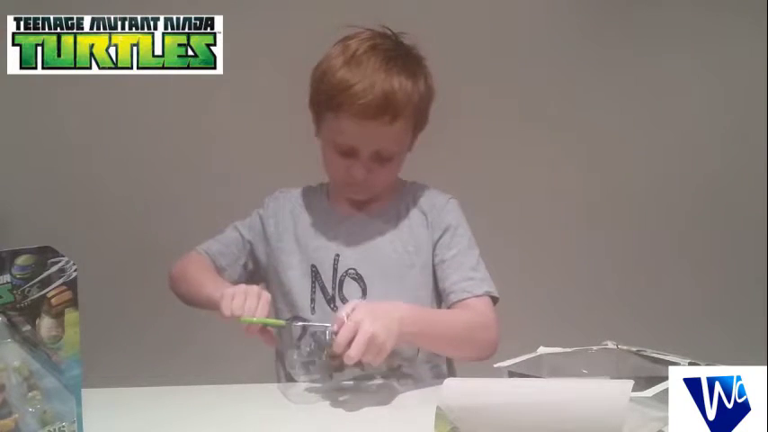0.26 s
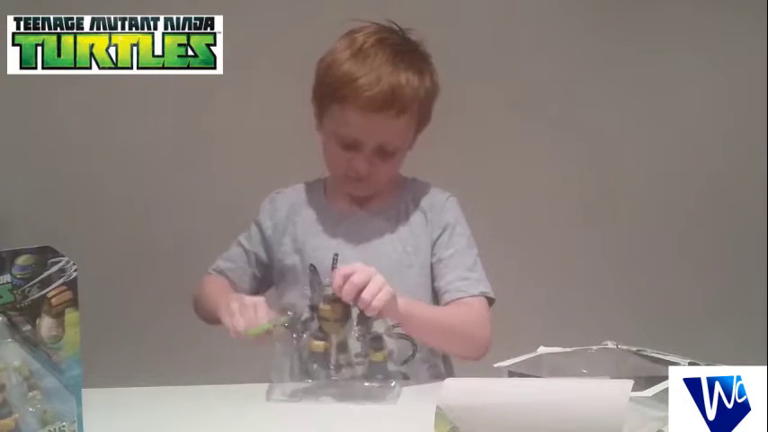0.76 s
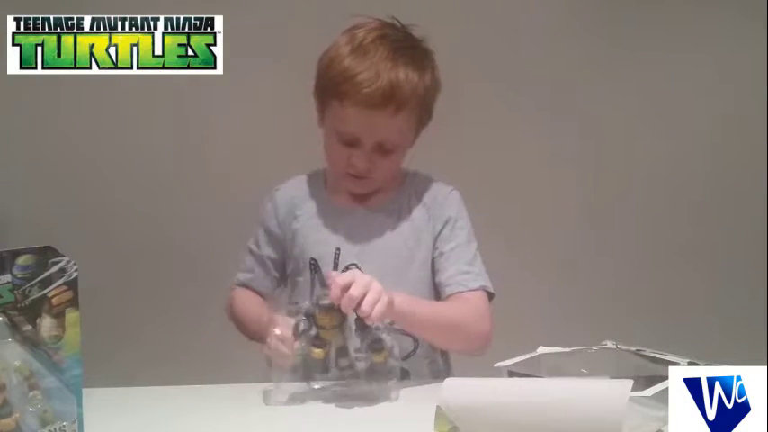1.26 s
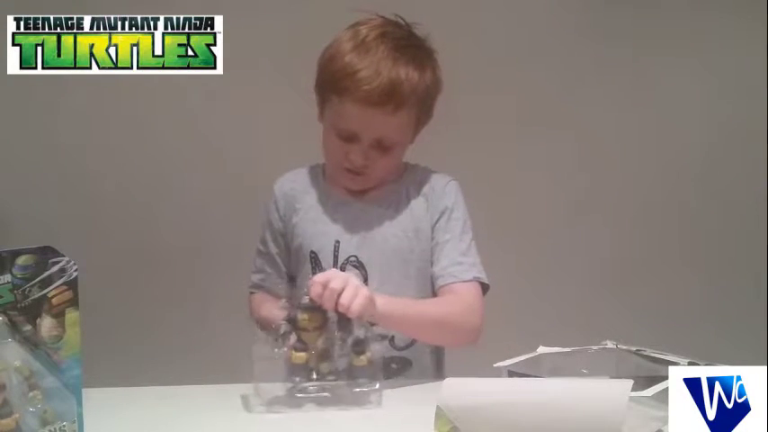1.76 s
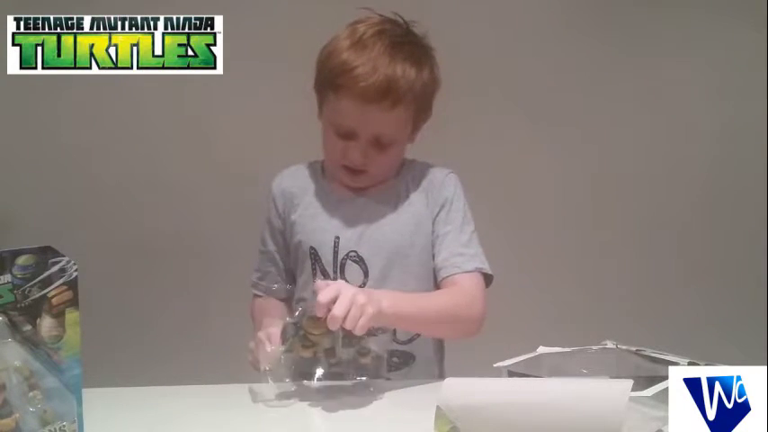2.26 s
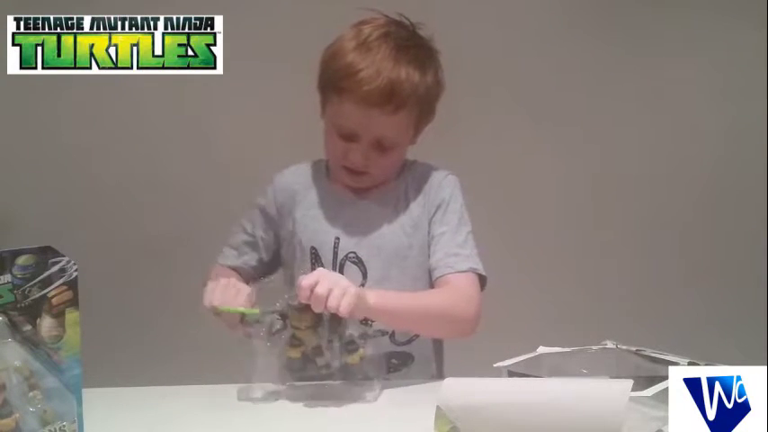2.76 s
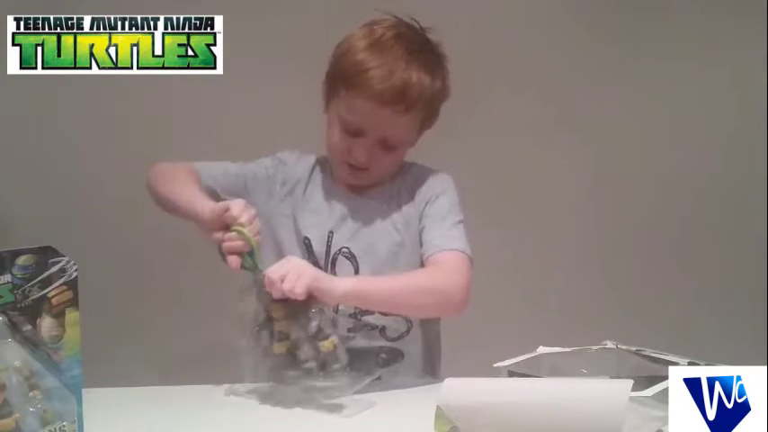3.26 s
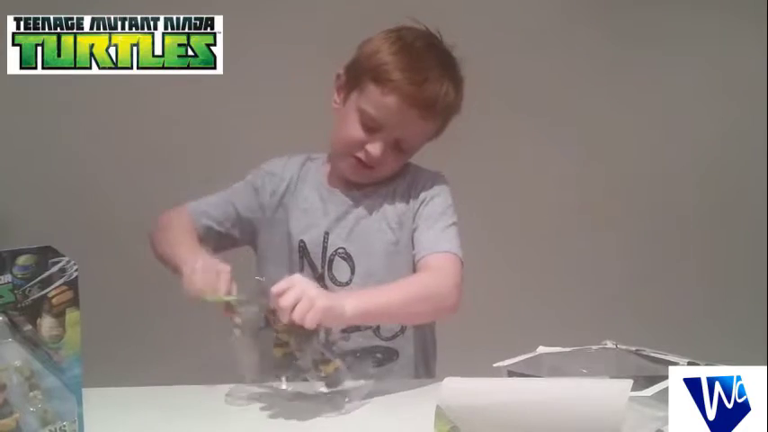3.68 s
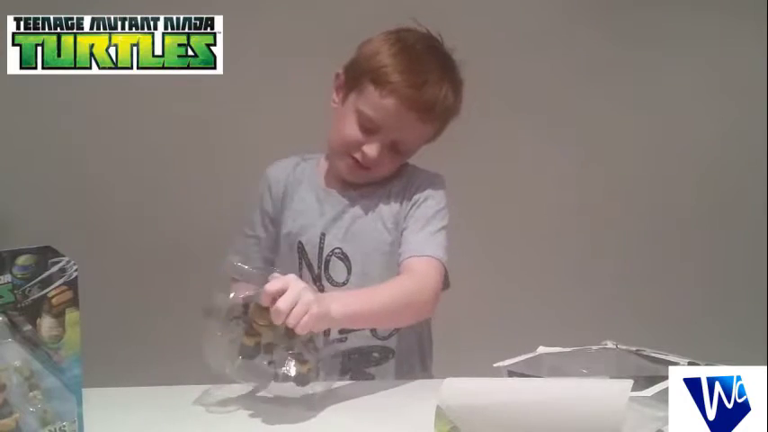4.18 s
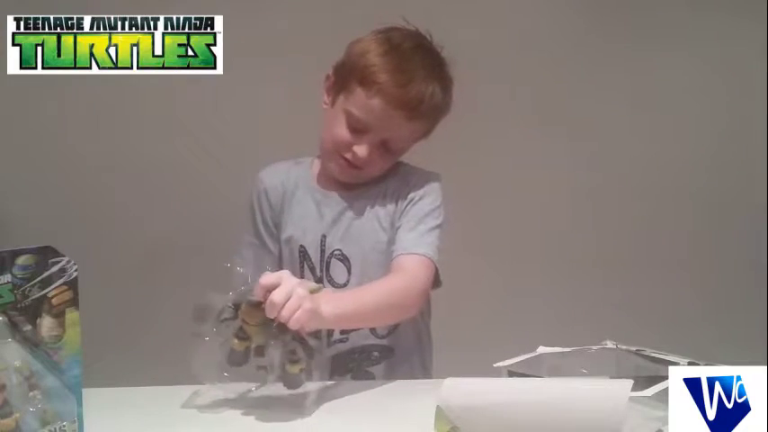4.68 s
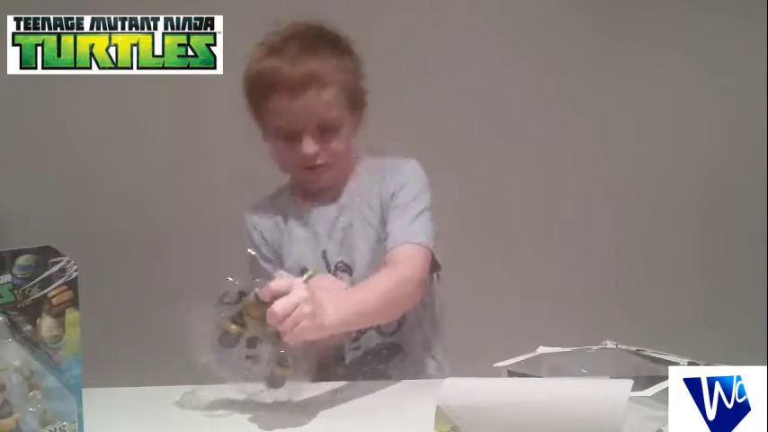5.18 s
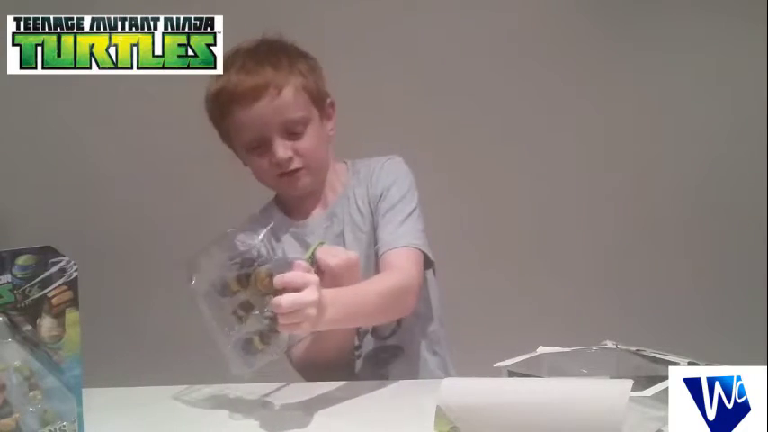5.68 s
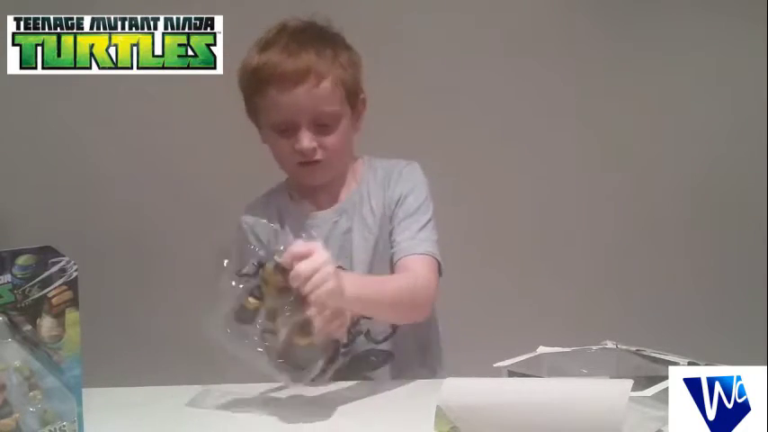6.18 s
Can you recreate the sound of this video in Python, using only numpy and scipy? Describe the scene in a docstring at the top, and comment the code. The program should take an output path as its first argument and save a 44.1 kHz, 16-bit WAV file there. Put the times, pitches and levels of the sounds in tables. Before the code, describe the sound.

Brittle plastic cracks and pops under scissors and hands. The pack judders and scrapes in short strokes, the tabletop drums low beneath it, and creases click. Strong knocks come midway, followed by dense crinkling, a sparser stretch, and sharp late snips before it calms. A bare, lively small room, heard from across the table, with low rumble and faint hiss.

```python
"""A bare, lively room, one microphone across the table from a stiff plastic blister pack being cut by hand.
Scissor blades snap through and creases click: short noise bursts that ring at the cut edge or fold.
Thin walls buckle with hollow pops, and the pack knocks on the table top: bursts through resonances.
Between them the rim judders and scrapes, the sheet crinkles and the table drums: trains of tiny slips.
One deep, soft bump comes early; low rumble and faint hiss lie under it all."""
import sys
import numpy as np
from scipy import signal
from scipy.fft import rfft, irfft, next_fast_len
from scipy.io import wavfile
from scipy.ndimage import uniform_filter1d

SR = 44100
rng = np.random.default_rng(int(sys.argv[2]) if len(sys.argv) > 2 else 0)


def to_wav(sig):
    """Store sig (one row per channel, or 1-D mono) as 16-bit WAV at the path in sys.argv[1].

    Samples outside -1..1 are clipped; the rate is SR.
    """
    pcm = np.clip(np.atleast_2d(sig), -1, 1) * 32767
    pcm = np.round(pcm).astype(np.int16)
    wavfile.write(sys.argv[1], SR, pcm.T)  # frames by channels


N = 282766

# All event and spectrum levels are relative: each layer has its own gain further down.
# rumble and hiss of the quiet room: f/Hz, level/dB
HISS_SPECTRUM = [(25, -17), (80, 3), (160, -21), (300, -23.5), (500, -35.5), (900, -18), (1500, -50.5),
                 (2200, -31), (3200, -43), (4300, -27), (6500, -68), (9500, -42.5), (16000, -54.5)]
# reverberation of the room: f/Hz, time to fall by 60 dB t60/s
ROOM_DECAY = [(150, 0.71), (600, 0.31), (1500, 0.37), (4500, 0.48), (9000, 0.41), (15000, 0.33)]
# modes of the table top: f/Hz, width/Hz, level/dB
TABLE_MODES = [(154.8, 11, -0.5), (199.3, 28, -13), (310, 19.5, -3.5), (264.5, 19, -11), (397.4, 14, -7),
               (480.3, 40, -4.5), (605, 63, -10.5), (695, 20, -19.5), (744, 41, -12), (902, 31, -9.5),
               (1060, 140, -15.5), (1181, 69, -16.5), (1620, 98, -17)]
# modes of the whole blister shell: f/Hz, width/Hz, level/dB
SHELL_MODES = [(1520, 6.3, -8), (1610, 18, -4), (1823, 5.9, 2), (1856, 11, -9), (1980, 14, -1.5),
               (2220, 42, -2), (2660, 11, -9)]
# ring of a buckling wall and its overtones: f/(pitch of the pop), level/dB
WALL_RING = [(.2, -40), (.5, -8), (.75, 2.5), (1.0, 6.5), (1.35, -5.5), (1.8, -6), (2.3, -19), (3.4, -20),
             (6.0, -47.5), (12, -43.5)]

# spectra of a crack, a thud, the juddering rim, its scrape, and the crinkling sheet: f/Hz, level/dB
CRACK_SPECTRUM = [(150, -22.5), (500, -6), (1200, 0), (2400, -2), (3300, -4), (4800, 1.5), (6200, -2),
                  (8500, 5), (12000, 5), (15500, -2.5)]
THUD_SPECTRUM = [(80, -31), (250, -19.5), (500, 6), (950, 0), (1700, -4), (2800, -10.5), (4500, -24.5),
                 (9000, -49.5)]
JUDDER_SPECTRUM = [(100, -7.5), (220, -13), (330, -8.5), (520, 1.5), (800, 2), (1100, -3.5), (1600, -25.5),
                   (4000, -45.5)]
SCRAPE_SPECTRUM = [(500, -55.5), (1000, 7.5), (1300, 2.5), (2000, 0.5), (2700, -5.5), (3500, -20.5),
                   (5500, -34), (12000, -56)]
CRINKLE_SPECTRUM = [(1500, -34.5), (4000, 6), (6000, -9), (9000, 1), (12000, 0), (15500, -3)]
# spectra of the table's drumming and of single crease ticks: f/Hz, level/dB
DRUM_SPECTRUM = [(90, -4.5), (145, 2.0), (200, 1.5), (320, -10.0), (600, -25)]
TICK_SPECTRUM = [(500, -13.5), (1500, 7.5), (2400, 0), (5500, -5), (8500, 5.5), (15000, -10.5)]
# colour of the judder when the rim skims and when it is pressed down: f/Hz, level/dB
SKIMMING = [(150, -26.5), (330, -0.5), (650, -6), (1100, -1.0), (2200, -18.0), (6000, -21.5)]
PRESSED = [(80, -7.5), (150, 4.5), (330, -0.5), (550, -4.0), (1100, -6.5), (2200, -22.0), (6000, -53.0)]

# the rim slides: full speed at t/s, run-up/s, hold/s, judder level/dB, scrape over judder/dB
RIM_SLIDES = [(0.253, 0.076, 0.034, -62.5, 10), (0.579, 0.082, 0.039, -30, -6.5),
              (0.787, 0.026, .02, -36.5, 0), (0.846, 0.12, 0.12, -40, -11.5),
              (1.237, 0.016, 0.014, -43, -21), (1.333, .05, 0.027, -44, -4),
              (1.45, 0.12, 0.0055, -34.5, -16.5), (1.659, 0.092, 0.053, -29.5, -8),
              (1.877, 0.061, 0.018, -74, 13), (2.252, 0.076, 0.04, -27, -10.5),
              (2.495, 0.12, 0.043, -40.5, -5), (2.727, 0.037, 0.014, -21, -12),
              (2.994, 0.032, 0.1, -45, -10), (3.101, 0.02, .01, -36, -8.5), (3.182, 0.11, 0.031, -42, -5.5),
              (3.29, 0.032, .015, -33.5, -7), (3.41, 0.031, 0.0067, -33, -14),
              (3.604, 0.099, 0.021, -32, -3.5), (3.726, 0.096, 0.12, -38, -1),
              (4.11, 0.028, 0.036, -45.5, -12), (4.29, 0.055, 0.041, -53, -4),
              (4.535, 0.05, 0.024, -40, -25), (4.72, .03, 0.022, -41.5, -20),
              (4.949, 0.033, 0.012, -51, -5.5), (5.238, 0.038, 0.0034, -28.5, -17)]
# the hands lean on the pack and the table drums: t/s, level/dB
HAND_PRESSES = [(0.19, -52), (0.27, -50.5), (0.79, -39), (0.87, -32), (0.94, -36), (1.252, -34.5),
                (1.35, -36.5), (1.5, -33), (1.74, -30), (2.29, -32.5), (2.41, -39), (2.59, -39),
                (2.735, -33.5), (3.1, -42), (3.449, -30.5), (3.722, -24), (3.824, -29), (4.115, -34),
                (4.17, -37), (4.289, -41.5), (4.548, -35), (4.62, -37), (4.71, -37), (4.829, -39),
                (4.96, -32.5), (5.06, -44.5), (5.232, -24.5)]
# the sheet is bent and crinkles: full strength at t/s, hold/s, level/dB
SHEET_BENDS = [(0.6, 0.011, -68), (0.785, 0.033, -55), (0.87, .14, -64), (1.33, 0.083, -49),
               (1.73, 0.014, -55), (2.27, 0.053, -43.5), (2.55, 0.015, -53), (2.72, 0.071, -54),
               (2.9, 0.33, -64), (3.31, 0.093, -47), (3.56, 0.073, -45.5), (3.72, 0.018, -46),
               (3.78, 0.031, -44.5), (4.65, .012, -60.5), (4.82, .012, -62.5)]
# the blades break through the plastic: t/s, level/dB, edge ring f/Hz, low body/dB, room/dB
BLADE_SNIPS = [(1.225, -17.5, 10800, 4, 2.5), (1.2366, -24.5, 10800, 1, 6), (1.4633, -9, 9000, -10.5, -3),
               (2.2441, -17.5, 8800, 9, 0.5), (2.4285, -13, 8200, 2.5, -1), (3.2621, -16, 10600, 14, 5),
               (5.1931, -36.5, 9120, 10.5, 10), (5.2003, -20.5, 8500, 10, 1.5),
               (5.3369, -8.5, 12800, 6.5, 3), (5.3448, -14.5, 9600, -14, -2.5), (5.7658, -18, 5000, 1.5, 6)]
# a crease in the sheet clicks: t/s, level/dB
CREASE_CLICKS = [(0.033, -50.5), (0.204, -55), (0.243, -45.5), (0.608, -48.5), (0.7541, -41.5),
                 (0.7651, -30.5), (0.7845, -33.5), (0.925, -43), (1.0614, -46), (1.7168, -31.5),
                 (2.148, -60), (2.7128, -23), (2.7668, -28.5), (2.8434, -36), (3.1123, -44.5),
                 (3.5427, -39), (3.5801, -28.5), (3.6379, -28.5), (3.7145, -27.5), (3.856, -32),
                 (4.161, -50.5), (4.322, -41), (4.5939, -41), (4.7523, -35), (4.787, -39.5), (5.1397, -45),
                 (5.681, -46.5)]
# a wall of the blister buckles: t/s, level/dB, pitch f/Hz, overtones/dB
WALL_POPS = [(0.174, -37, 857, -5.5), (0.224, -33, 875, 1.5), (0.351, -35.5, 810, -2),
             (0.466, -35, 759, -1), (0.755, -26.5, 790, 4), (0.786, -34.5, 1007, 8.5),
             (1.057, -34, 1107, 7), (1.463, -27, 2534, -6), (2.148, -55.5, 4340, -2),
             (2.431, -16, 1610, -3), (2.844, -23.5, 765, 6), (3.183, -35, 1275, -0.5),
             (3.213, -36, 1584, -16.5), (3.263, -20.5, 2430, 6.5), (3.534, -32.5, 1618, 2),
             (3.579, -23, 1980, 2.5), (3.686, -30, 773, -1.5), (4.238, -41, 1053, 3.5),
             (4.319, -24, 1095, 4), (4.324, -28.5, 1790, -11), (4.594, -25.5, 1120, -1), (4.7, -29, 899, 5),
             (4.7522, -29.5, 1360, -6.5), (4.787, -31, 1044, 13.5), (5.335, -15, 1060, 7.5),
             (5.681, -54.5, 2530, 2.5), (5.764, -29.5, 2180, 13.5), (6.037, -41.5, 1095, -8),
             (6.255, -50, 1060, -11)]
# the pack strikes the table: t/s, level/dB
TABLE_KNOCKS = [(0.508, -48), (0.754, -22), (1.59, -34.5), (2.413, -23), (2.43, -19), (2.532, -18),
                (2.714, -10.5), (2.765, -25), (2.842, -20.5), (3.1, -40), (3.579, -19), (5.229, -21.5)]

# how fast a slide dies; how much of its judder the table drums along with
SLIDE_STOP_DB_PER_S, DRUM_FOLLOWS_DB = 167.5, -17
PRESS_RISE_S, PRESS_HOLD_S, PRESS_FADE_DB_PER_S = .04, 0.004, 172.5
BEND_RISE_S, BEND_FADE_DB_PER_S = 0.04, 162.5
# the held pack never lies quite still: when it rests on the table, and the levels of its stirring
HELD_S, HELD_LENGTH_S = 0.62, 4.95
STIR_DRUM_DB, STIR_JUDDER_DB, STIR_SCRAPE_DB, STIR_CRINKLE_DB = -57, -62.5, -64.5, -77.5
LIFTED_DB = -8.5  # the stirring before and after, with the pack off the table
# all creases share one edge ring, low body and room level
CREASE_HZ, CREASE_BODY_DB, CREASE_ROOM_DB = 8170, 12.5, -4.5
# decay by 60 dB and build-up time constant of a single crack
CRACK_T60_S, CRACK_RISE_S = .0048, .0006
TOP_HZ = 15850  # band limit of the recorder


def amp(db):
    """Gain of a level in dB."""
    return np.exp(np.asarray(db) * (np.log(10) / 20))


def unit(x):
    """x at rms 1."""
    return x / np.sqrt(np.mean(x ** 2) + 1e-20)


def along(points, hz):
    """(f/Hz, value) points read on a log frequency axis."""
    f, value = np.transpose(points)
    return np.interp(np.log(hz + 1), np.log(f), value)


def filtered(x, response):
    """x times a complex response of frequency, padded so that ringing can die."""
    size = next_fast_len(len(x) + SR // 4)
    hz = np.fft.rfftfreq(size, 1 / SR)
    return irfft(rfft(x, size) * response(hz), size)[:len(x)]


def coloured(x, spectrum, size=2048):
    """x through a causal filter with the given spectrum."""
    gain = amp(along(spectrum, np.fft.rfftfreq(size, 1 / SR)))
    # folding the cepstrum forward gives minimum phase: no sound ahead of its cause
    cepstrum = irfft(np.log(gain))
    cepstrum[1:size // 2] *= 2
    cepstrum[size // 2 + 1:] = 0
    impulse = irfft(np.exp(rfft(cepstrum)))
    return signal.oaconvolve(x, impulse)[:len(x)]


def resonate(x, modes):
    """x through parallel resonances, rows of f/Hz, width/Hz, level/dB."""
    def response(f):
        return sum(amp(db) * 1j * f * width / (centre * centre - f * f + 1j * f * width)
                   for centre, width, db in modes)
    return filtered(x, response)


def even(x, seconds):
    """x with its slow swells taken out, at rms 1."""
    power = np.abs(uniform_filter1d(x ** 2, int(seconds * SR)))
    return x / np.sqrt(power + 1e-12)


def slips(rate, spread_db):
    """Tiny impulses at random times and of random sizes; rate is per second."""
    at = np.flatnonzero(rng.random(N) < rate / SR)
    push, size = rng.standard_normal((2, N))[:, at]
    return np.bincount(at, push * amp(spread_db * size), N)


def room(x, wall_delay=.0105, early_db=-5):
    """The room's answer: thin at first, stronger once the walls reply, dying by band."""
    hz = np.fft.rfftfreq(256, 1 / SR)
    frame_t = np.arange(SR // 256) * 128 / SR
    cells = rng.standard_normal((len(hz), 2 * len(frame_t))).view(complex)
    decay = np.exp(-np.log(1000) * frame_t / along(ROOM_DECAY, hz)[:, None])
    tail = signal.istft(cells * decay)[1]
    t = np.arange(len(tail)) / SR
    tail = tail * np.where(t < wall_delay, amp(early_db), 1) * (t > .002)
    return signal.fftconvolve(x, tail / np.sqrt(np.sum(tail ** 2)))


def diffuse(x, wet_db):
    """x with the room's answer mixed in, at rms 1."""
    return unit(x + amp(wet_db) * room(x)[:N])


def add(track, s, db, spectrum, t60, attack, room_db):
    """Put a burst of the given colour, with its reverberation, into the track at time s."""
    t = np.arange(SR // 16) / SR
    rattle = rng.standard_normal(len(t)) * amp(-60 * t / t60) * (1 - np.exp(-t / attack))
    # the room gathers what is radiated in all directions, so it hears the smooth mean spectrum
    click = 1.0 * (t == 0)
    heard = amp(room_db) * room(unit(coloured(click, spectrum)))
    heard[:len(t)] += unit(coloured(rattle, spectrum))
    part = track[max(round(s * SR), 0):][:len(heard)]
    part += amp(db) * heard[:len(part)]


def stroke(s, rise, hold, fade_db_per_s, run_up_db=20, bend=1.6):
    """Gain that climbs to 1 at time s, holds, then dies away."""
    t = np.arange(N) / SR - s
    early = np.maximum(-t, 0) / max(rise, .001)
    late = np.maximum(t - hold, 0)
    return amp(np.maximum(-run_up_db * early ** bend - fade_db_per_s * late, -120))


def background(level_db=-63):
    """Low rumble and faint hiss of the quiet room: coloured steady noise."""
    return amp(level_db) * unit(coloured(rng.standard_normal(N), HISS_SPECTRUM, size=8192))


def handling():
    """Levels in dB of drumming, judder, scrape and crinkle: the powers of all strokes add up."""
    stir = np.maximum(stroke(HELD_S, .1, HELD_LENGTH_S, SLIDE_STOP_DB_PER_S), amp(LIFTED_DB))
    juddering, scraping, drumming, crinkling = np.zeros((4, N))
    for s, rise, hold, db, scrape_db in RIM_SLIDES:
        power = (amp(db) * stroke(s, rise, hold, SLIDE_STOP_DB_PER_S)) ** 2
        juddering += power
        scraping += power * amp(scrape_db) ** 2
    for s, db in HAND_PRESSES:
        drumming += (amp(db) * stroke(s, PRESS_RISE_S, PRESS_HOLD_S, PRESS_FADE_DB_PER_S)) ** 2
    drumming += amp(DRUM_FOLLOWS_DB) ** 2 * juddering
    for s, hold, db in SHEET_BENDS:
        crinkling += (amp(db) * stroke(s, BEND_RISE_S, hold, BEND_FADE_DB_PER_S)) ** 2
    layers = [(drumming, STIR_DRUM_DB), (juddering, STIR_JUDDER_DB),
              (scraping, STIR_SCRAPE_DB), (crinkling, STIR_CRINKLE_DB)]
    return [10 * np.log10(power + (amp(stir_db) * stir) ** 2) for power, stir_db in layers]


def table_drum():
    """The weight of the hands works three low modes of the table top, 155 to 310 Hz."""
    boom = resonate(slips(rate=2600, spread_db=3.5), TABLE_MODES[:3])
    return even(coloured(boom, DRUM_SPECTRUM), seconds=.04)


def judder(weight_db, ring_db=2, middle_db=-15, range_db=5):
    """The rim catches on the table: thin when it skims, dull when it is pressed down."""
    catches = diffuse(slips(rate=1000, spread_db=2.5), wet_db=-1.5)
    table_ring = unit(resonate(catches, TABLE_MODES[2:]))
    shudder = unit(coloured(catches, JUDDER_SPECTRUM)) + amp(ring_db) * table_ring
    light = unit(coloured(shudder, SKIMMING))
    heavy = unit(coloured(shudder, PRESSED))
    pressed = (1 + np.tanh((weight_db - middle_db) / (2 * range_db))) / 2  # 0 skims, 1 pressed
    return even((1 - pressed) * light + pressed * heavy, seconds=.035)


def drag(tick_from_db=-52, drum_gain_db=-2.0, judder_gain_db=-1.5, scrape_gain_db=-4.0,
         crinkle_gain_db=-3.0, tick_gain_db=-7, room_db=-12):
    """The pack's rim sticks and slips on the drumming table while its creases crinkle."""
    drum_db, judder_db, scrape_db, crinkle_db = handling()
    drum = table_drum()
    scrape = diffuse(coloured(slips(rate=820, spread_db=8.5), SCRAPE_SPECTRUM), wet_db=2.5)
    crinkle = diffuse(coloured(slips(rate=2300, spread_db=0.5), CRINKLE_SPECTRUM), wet_db=6.0)
    ticks = unit(coloured(slips(rate=75, spread_db=-1), TICK_SPECTRUM))
    # below tick_from_db the single ticks sink twice as fast as the crinkle
    tick_db = crinkle_db + tick_gain_db + np.minimum(crinkle_db - tick_from_db, 0)
    rub = (amp(judder_db + judder_gain_db) * judder(weight_db=drum_db - judder_db)
           + amp(scrape_db + scrape_gain_db) * scrape
           + amp(crinkle_db + crinkle_gain_db) * crinkle
           + amp(tick_db) * ticks)
    return amp(drum_db + drum_gain_db) * drum + rub + amp(room_db) * room(rub)[:N]


def snaps(gain_db=-22, room_db=2, edge_db=7, edge_octaves=0.064):
    """Snips and crease clicks: each brief crack rings an edge; the room draws it out."""
    track, hz = np.zeros(N), np.geomspace(100, 16000, 60)
    creases = [(s, db, CREASE_HZ, CREASE_BODY_DB, CREASE_ROOM_DB) for s, db in CREASE_CLICKS]
    for s, db, edge_hz, body_db, wet_db in BLADE_SNIPS + creases:
        edge = edge_db * np.exp(-.5 * (np.log2(hz / edge_hz) / edge_octaves) ** 2)
        body = body_db / (1 + (hz / 4000) ** 4)  # a shelf below 4 kHz
        spectrum = np.c_[hz, along(CRACK_SPECTRUM, hz) + edge + body]
        add(track, s, db + gain_db, spectrum, CRACK_T60_S, CRACK_RISE_S, room_db + wet_db)
    return track


def bump(start=0.11, hz=74, level_db=-44, t60=1.0, attack=0.034):
    """A soft, deep bump as the hands settle on the pack: one decaying sine."""
    t = np.maximum(np.arange(N) / SR - start, 0)
    return amp(level_db - 60 * t / t60) * (1 - np.exp(-t / attack)) * np.sin(2 * np.pi * hz * t)


def pops(gain_db=-18.5, room_db=-1.5, shell_db=-9):
    """A wall flips over and rings briefly, with more or less overtone; the whole shell answers."""
    track = np.zeros(N)
    for s, db, hz, overtone_db in WALL_POPS:
        # the overtone level comes in over the first octave above the pitch
        ring = [(hz * ratio, level + overtone_db * np.clip(np.log2(ratio), 0, 1))
                for ratio, level in WALL_RING]
        add(track, s, db + gain_db, ring, t60=0.03, attack=0.0001, room_db=room_db)
    return track + amp(shell_db) * np.std(track) * unit(resonate(track, SHELL_MODES))


def knocks(gain_db=-18, ring_db=-8, room_db=-1):
    """The hollow pack thuds on the table and sets the top ringing."""
    track = np.zeros(N)
    for s, db in TABLE_KNOCKS:
        add(track, s, db + gain_db, THUD_SPECTRUM, t60=0.046, attack=0.00015, room_db=room_db)
    return track + amp(ring_db) * np.std(track) * unit(resonate(track, TABLE_MODES[2:]))


def scene():
    """Everything as it reaches one microphone across the table."""
    return (background() + drag() + snaps() + bump() + pops() + knocks())[None]


def record(dry):
    """The recorder cuts off steeply above its band limit."""
    def band_limit(hz):
        return 1 / np.sqrt(1 + (hz / TOP_HZ) ** 200)
    return np.array([filtered(x, band_limit) for x in dry])


dry = scene()
out = record(dry)
to_wav(out)
```